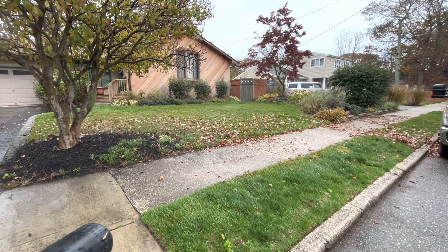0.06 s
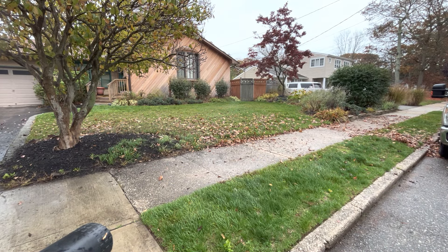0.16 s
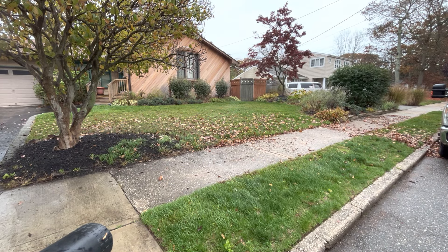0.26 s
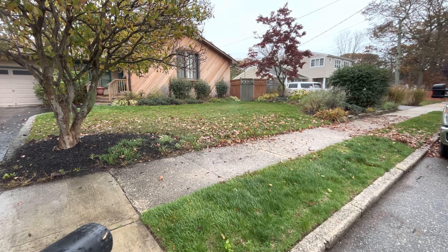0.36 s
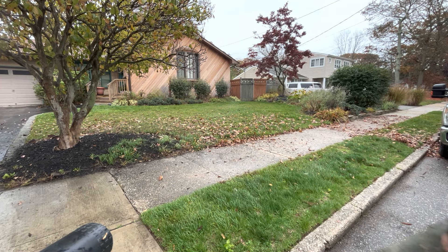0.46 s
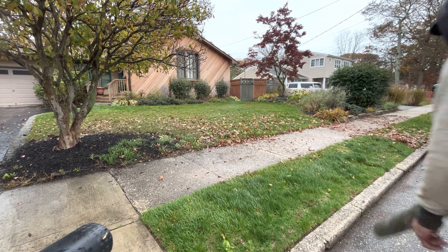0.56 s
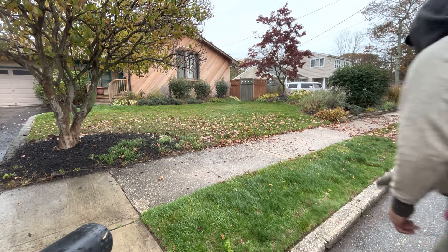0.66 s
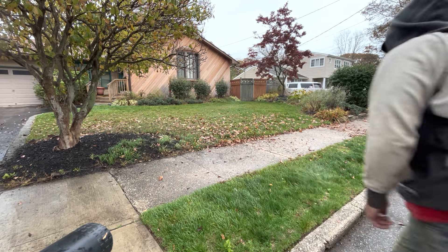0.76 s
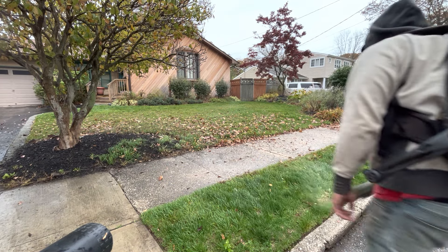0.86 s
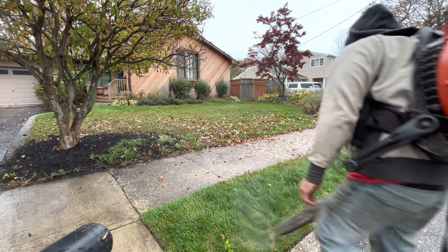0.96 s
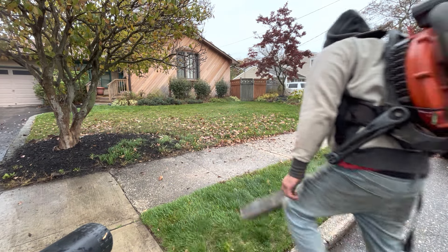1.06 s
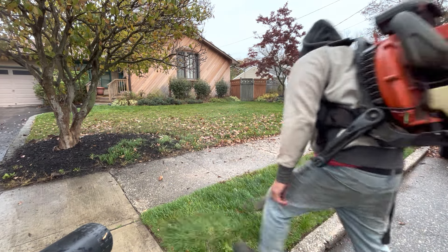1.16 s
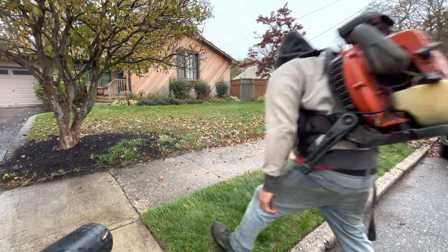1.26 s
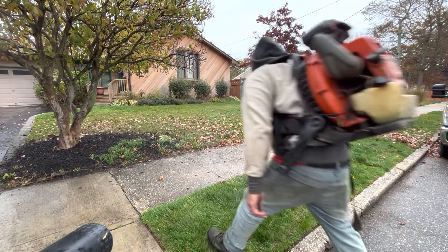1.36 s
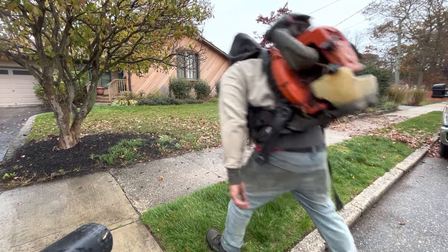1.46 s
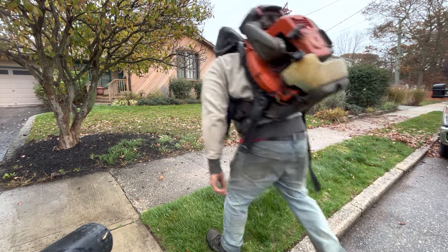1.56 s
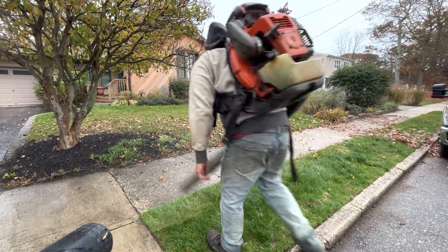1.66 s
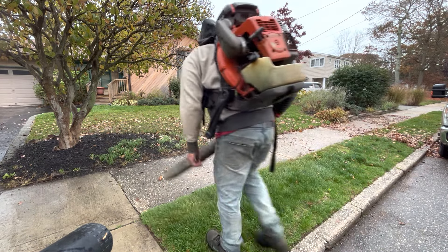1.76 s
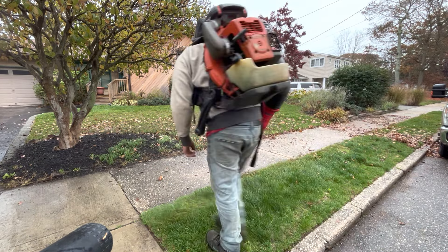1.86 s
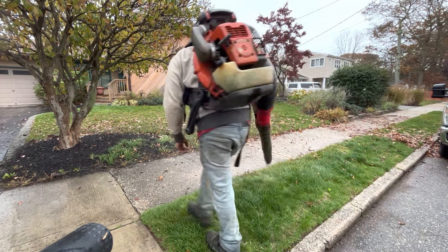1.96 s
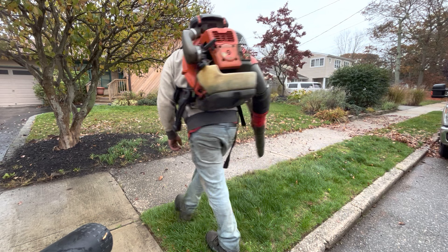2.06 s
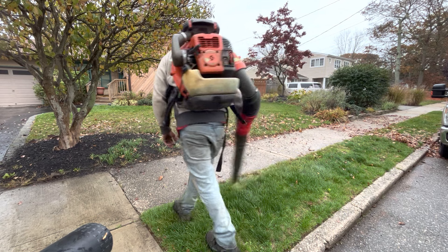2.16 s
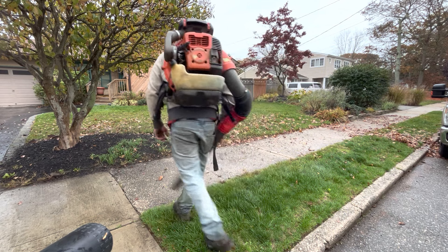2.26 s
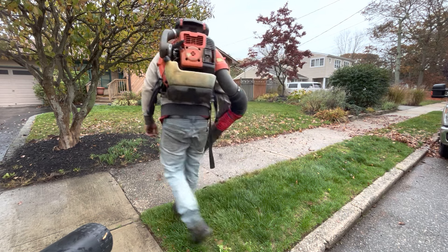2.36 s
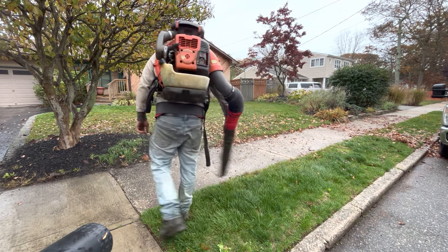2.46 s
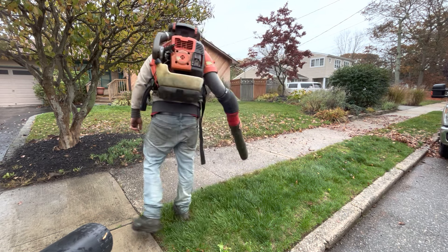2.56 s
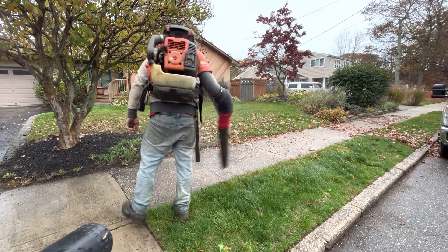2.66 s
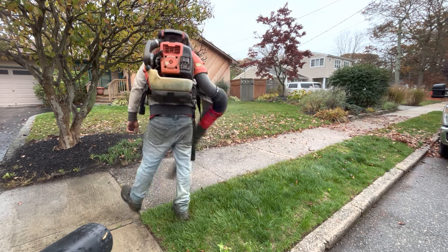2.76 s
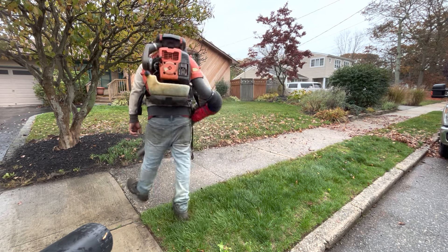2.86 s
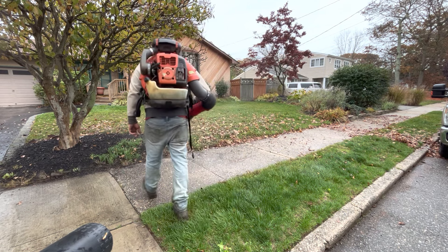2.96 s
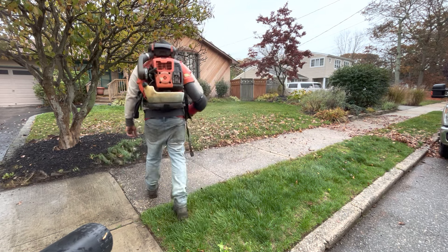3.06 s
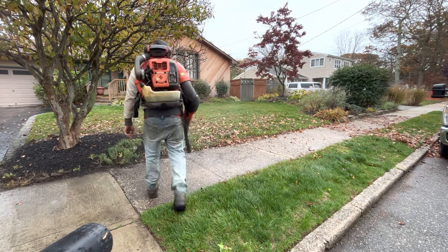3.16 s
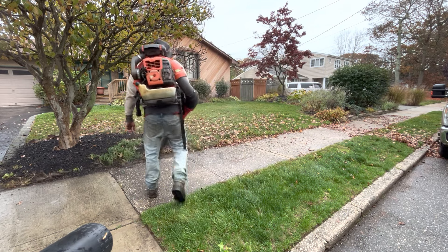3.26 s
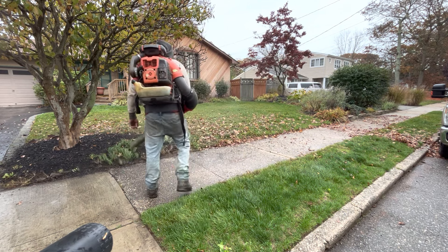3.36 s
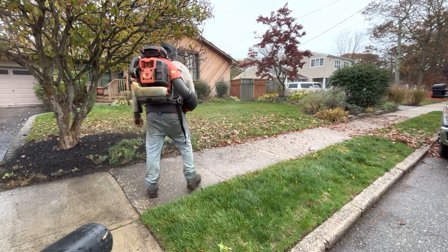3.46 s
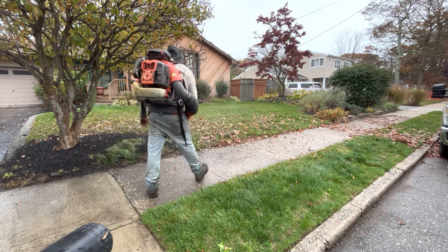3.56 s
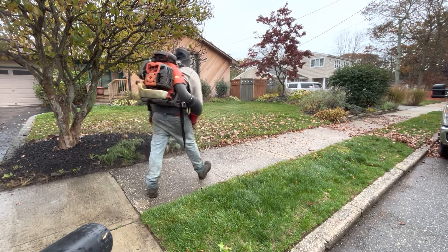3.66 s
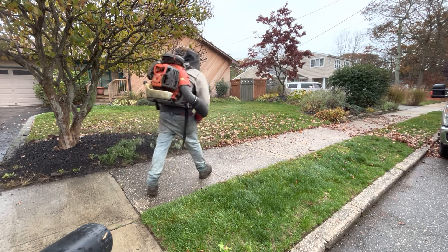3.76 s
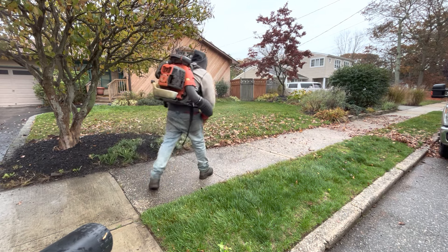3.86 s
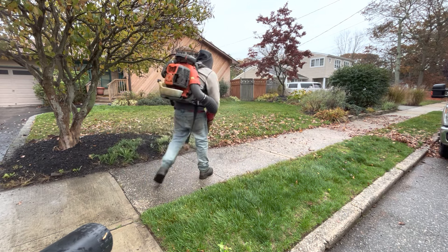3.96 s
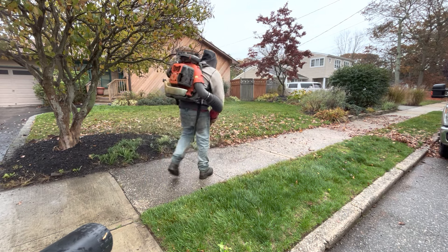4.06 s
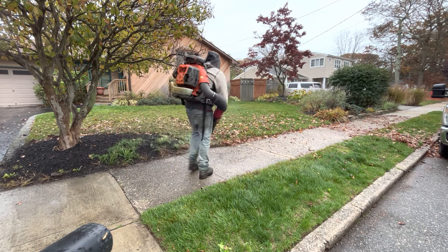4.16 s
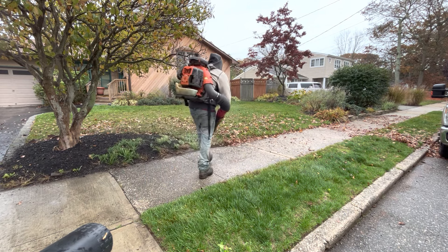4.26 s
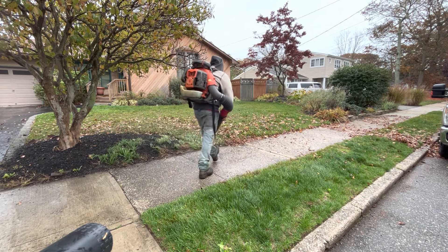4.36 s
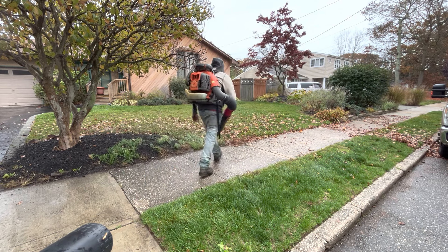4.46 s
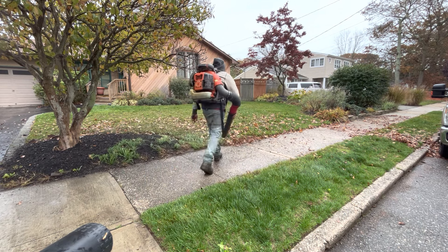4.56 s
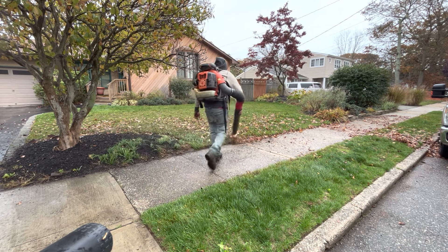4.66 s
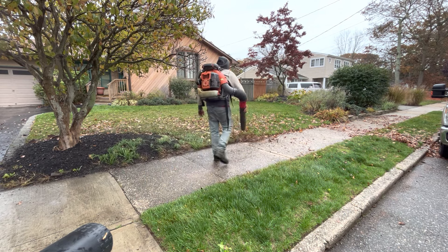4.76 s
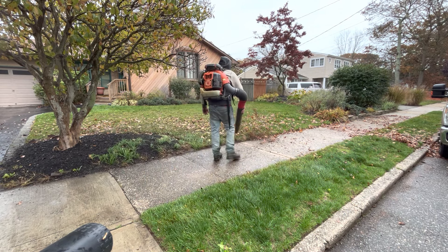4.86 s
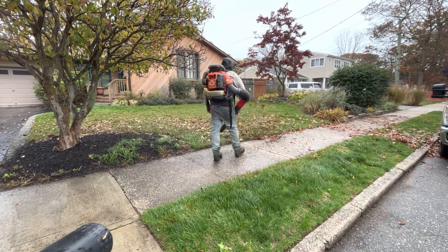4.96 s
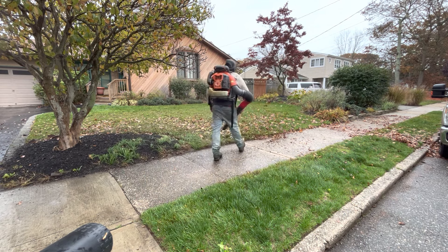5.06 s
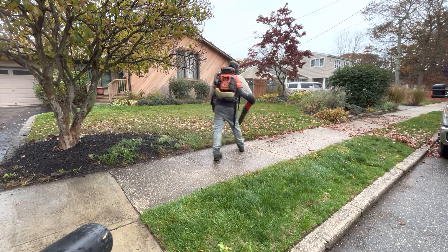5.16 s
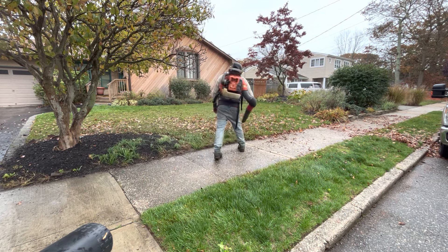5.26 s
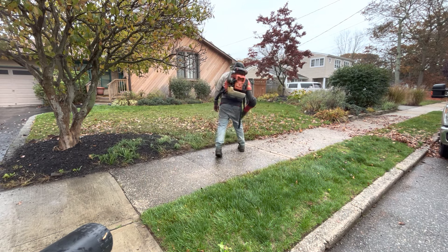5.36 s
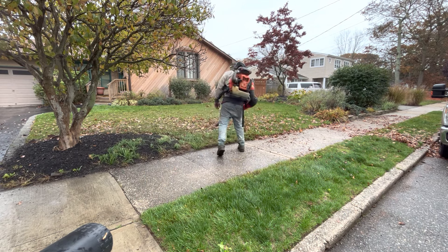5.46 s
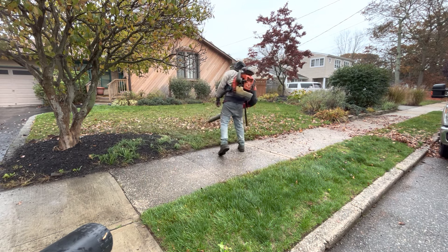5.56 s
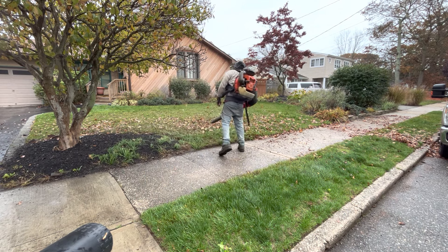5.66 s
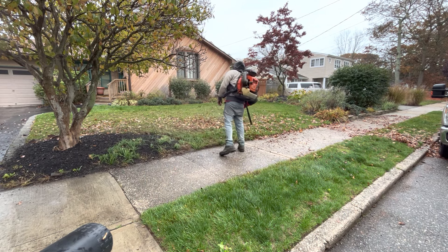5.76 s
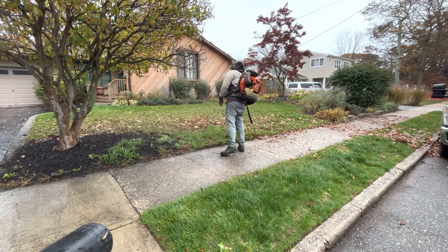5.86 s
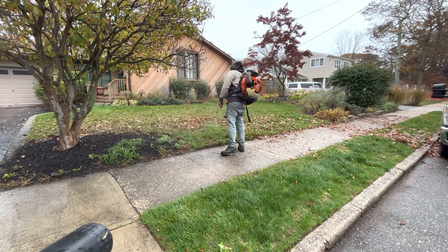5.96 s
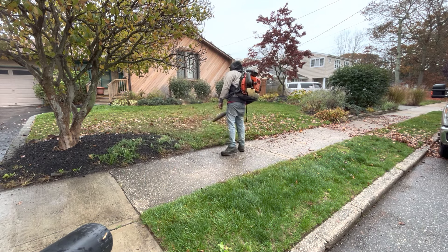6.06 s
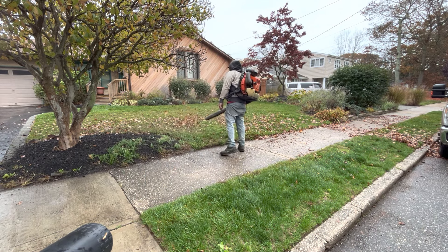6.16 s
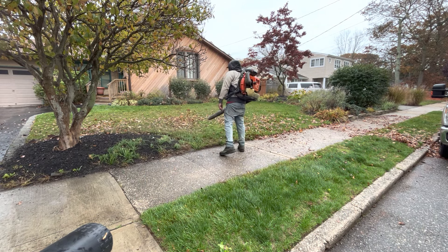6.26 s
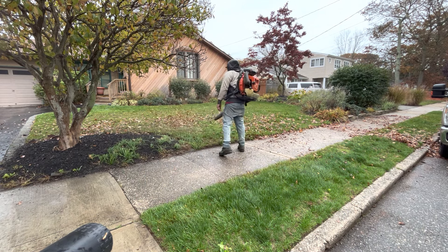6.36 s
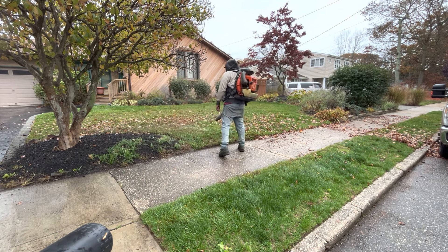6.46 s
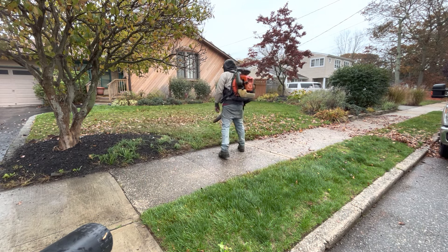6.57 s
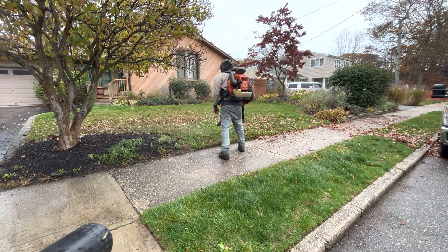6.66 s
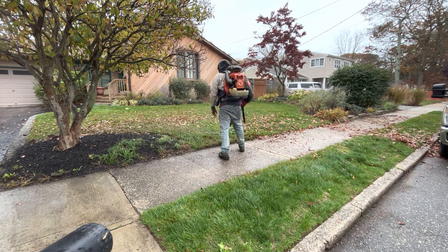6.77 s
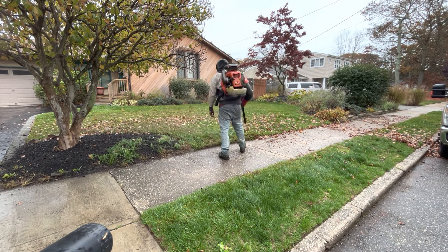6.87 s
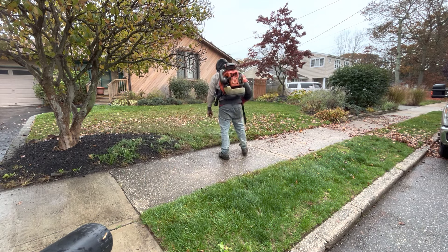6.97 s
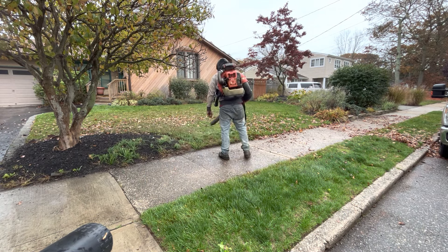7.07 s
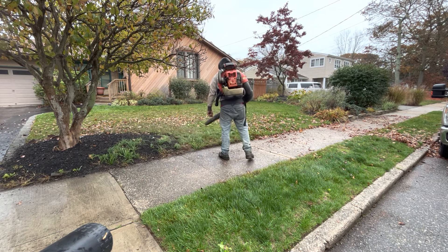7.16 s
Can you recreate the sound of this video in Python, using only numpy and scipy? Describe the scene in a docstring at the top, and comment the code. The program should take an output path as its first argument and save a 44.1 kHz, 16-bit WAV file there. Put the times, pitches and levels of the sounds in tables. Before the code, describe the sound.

Outdoors on a suburban lawn, a two-stroke backpack blower runs steadily at full throttle. It passes very close on the right of a fixed stereo microphone, with heavy low hum, nasal buzz and roaring air, then drifts to the center and grows weaker as the worker walks away. Hiss from the swinging nozzle rises and dips, short thin whines flare up, and two tiny grit ticks occur. It comes back slightly nearer at the end.

```python
"""On a lawn, a worker with a two-stroke backpack leaf blower at full throttle passes close on the right,
walks off and at the end comes part of the way back.
Each firing drives the exhaust hum and rings the muffler; the echo off the ground shifts as he moves.
Air roars through the fan and hisses from the swinging nozzle, throbbing with the engine.
Brief whines flare up, and two flicks of grit tick against the tube."""
import sys
import numpy as np
from scipy import signal
from scipy.fft import rfft, irfft, next_fast_len
from scipy.io import wavfile
from scipy.ndimage import uniform_filter1d

SR = 44100
rng = np.random.default_rng(int(sys.argv[2]) if len(sys.argv) > 2 else 0)


def waveform_to_disk(signal):
    """Save audio, clipped to [-1, 1], as 16-bit WAV at the path in sys.argv[1]."""
    frames = np.transpose(np.atleast_2d(signal))
    scaled = np.clip(frames, -1, 1) * 32767
    samples = np.round(scaled).astype(np.int16)
    wavfile.write(sys.argv[1], SR, samples)


N = 318402  # samples in the scene
HOP = 256  # samples from one frame to the next
TIME = np.arange(N) / SR
FRAME_S = np.arange(-(-N // HOP) + 1) * HOP / SR
BIN_HZ = np.fft.rfftfreq(4 * HOP, 1 / SR)

# Average engine speed: time_s, firings_per_s
ENGINE_SPEED = [(0.0, 117.7), (0.54, 117.4), (0.62, 116.7), (1.2, 116.5), (1.26, 117.0), (1.67, 116.1),
                (1.81, 116.8), (2.03, 115.9), (2.23, 116.6), (2.79, 116.2), (3.1, 116.8), (3.6, 116.2),
                (3.68, 116.7), (5.0, 116.5), (5.41, 115.9), (5.45, 116.8), (6.8, 117.1), (6.84, 116.7),
                (7.18, 116.7), (7.22, 117.3)]
# The worker's path: time_s, distance_m, bearing_deg (positive to the right)
WALK_PATH = [(0.0, 2, 56), (0.5, 1.4, 48), (1.05, 1.335, 43), (1.35, 1.5, 29), (1.66, 1.74, 12.5),
             (2.1, 1.62, 6), (2.65, 2.2, -3.5), (3.05, 2.07, -5.5), (3.5, 3.2, -8.0), (4.1, 4.6, -5),
             (4.8, 5.3, 0.5), (5.3, 5.3, 7), (5.9, 6.8, 11.5), (6.6, 6.5, 9.5), (7.22, 4.15, 6)]
# How squarely the exhaust faces the microphone: time_s, share (0-1)
EXHAUST_FACING = [(0, 0.24), (1.2, 0.2), (1.7, 0.94), (3, 0.31), (4, 0.75), (5, 0.34), (5.6, 0.3),
                  (7.2, 0.6)]
# Swing of the nozzle: time_s, gain_db toward the microphone, before each air layer's share
NOZZLE_AIM = [(0, -1.5), (.4, 1), (1.4, 0), (2.1, 0), (2.45, -1.8), (2.85, -3), (3.2, -6.5), (3.45, -5),
              (3.8, 0.5), (4.1, -0.5), (4.5, -0.9), (4.9, -1.4), (5.4, -2.5), (6.1, -1), (6.45, -1.1),
              (6.85, 1), (7.22, -2.5)]

# Low partials of the exhaust: multiple of the firing rate, curve name, extra_db, side_on_gain_db
HUM_PARTIALS = [(1, "boom", 0, 1), (2, "drone", 0, 2), (3, "growl", 1.5, 2.5), (4, "blare", 0, 4.5),
                (5, "bray", -0.7, 0.5), (6, "drone", -16, 2.5)]
# Level curves of the hum, before the extra gains: time_s, level_db
BOOM_LEVEL = [(0, -33.5), (.5, -29.5), (1, -30), (1.8, -26.5), (2.7, -32.5), (3.35, -41), (3.8, -37),
              (4.4, -37), (5.3, -33.5), (5.8, -34.5), (7.22, -32)]  # the firing note
DRONE_LEVEL = [(0, -28.5), (.55, -26), (1.3, -26), (1.7, -28), (2.9, -27), (3.4, -30), (4.2, -31),
               (5.5, -40.5), (6.1, -37.5), (6.6, -37.5), (7.22, -32)]  # its octave, also used for the sixth partial
GROWL_LEVEL = [(0, -39), (.5, -33), (1.2, -32), (2.1, -36), (3, -46), (4.5, -48), (5.1, -51.5),
               (5.9, -42.5), (7.22, -44)]  # the third partial
BLARE_LEVEL = [(0, -29.5), (.45, -30.5), (1.4, -39.5), (2.4, -39), (2.9, -33.5), (4, -42), (4.7, -43.5),
               (5.6, -40), (6.2, -38.5), (7.22, -44.5)]  # the double octave
BRAY_LEVEL = [(0, -28.5), (.5, -23), (1.1, -26), (1.5, -29.5), (2.05, -31), (2.8, -42.5), (3.3, -44),
              (4, -58), (4.35, -39), (4.85, -45), (5.15, -50), (5.65, -41), (6.3, -41), (7.22, -46.5)]  # the fifth partial
# Level curves of the partials that sing out, before the shared boost: time_s, level_db
HONK_LEVEL = [(0, -44), (.7, -33), (1.1, -34), (1.7, -44.5), (2.1, -48), (2.5, -39.5), (2.85, -40),
              (3.25, -44), (3.6, -38), (4.1, -51), (4.5, -41.5), (5.2, -41.5), (5.8, -62), (6.7, -57),
              (7.22, -43)]
TWANG_LEVEL = [(0, -35), (.8, -43), (1.9, -43), (2.4, -47), (3, -46), (3.55, -53), (3.75, -45), (4.2, -42),
               (4.5, -57), (5.5, -46), (6.3, -49), (7.22, -45)]
NASAL_LEVEL = [(0, -39), (0.4, -40.5), (1.3, -31.5), (1.5, -41), (1.8, -36), (2.1, -48), (2.55, -50),
               (2.7, -40.5), (2.92, -36), (3.1, -39.5), (3.3, -54), (3.52, -40), (4.3, -41), (5.3, -45.5),
               (5.55, -55), (5.75, -42), (6.05, -53), (7.22, -48)]
REEDY_LEVEL = [(0, -37.5), (.75, -36), (1.2, -47), (1.7, -50), (2.13, -39), (2.3, -50), (3.35, -51),
               (3.55, -43), (4, -39.8), (4.55, -41.5), (5.18, -54), (5.32, -44), (5.8, -55), (6.6, -50),
               (6.8, -45.5), (7.22, -44)]
# Ring of the muffler, before the loss with distance: time_s, level_db
RASP_LEVEL = [(0.0, -29), (0.4, -31), (1.2, -30.5), (1.6, -28.5), (2.1, -28), (2.7, -30.5), (3.3, -32),
              (3.7, -27.5), (4.4, -28), (5.0, -26.5), (5.4, -28), (5.8, -30.5), (6.4, -27), (6.9, -23.5),
              (7.22, -27.5)]
# Resonances of the muffler: pitch_hz, width_hz, relative level_db
MUFFLER_MODES = [(1070, 240, -18), (1294, 80, -14.5), (1605, 100, -13), (1985, 42, -18), (2215, 52, -16.5),
                 (2780, 87, -26), (2880, 1500, -21)]
# Resonances of the fan housing: pitch_hz, width_hz, relative level_db
HOUSING_MODES = [(3400, 240, -10), (3750, 390, -16), (4005, 180, -14), (4940, 240, -26), (5600, 190, -13.5),
                 (6880, 150, -19)]

# Layers of the air, by name: base level_db, loss_db per doubling of distance,
# share of the nozzle's swing, loss_db behind his body (negative means louder)
AIR_LAYERS = {"roar": (-29.5, 3.5, 0.23, -2), "rush": (-28, 3.5, 1, -0.5), "sizzle": (-31, 4, 1.3, 0.5),
              "hiss": (-30.5, 4.5, 1.78, 14), "whistle": (-40, 3, 3, 14)}
# Tone colours of the air: pitch_hz, relative level_db
ROAR_COLOUR = [(20, -62), (43, -27), (68, -9.5), (130, -13.5), (200, -6.5), (300, -3.5), (410, 2.5),
               (520, 0.5), (630, 5), (800, -3), (1000, -3), (1400, -26), (3000, -72)]
RUSH_COLOUR = [(400, -60), (800, -11), (1100, 1), (1600, 1), (2200, -1), (2900, -4.5), (3450, -4.5),
               (3950, -11.5), (4600, -45), (7000, -58)]
SIZZLE_COLOUR = [(2500, -16.5), (3700, 3.5), (4200, 2), (4700, 3), (5100, 6.5), (5600, 1.5), (6000, 2.5),
                 (6400, 1), (7100, -7.5), (7800, -5), (9000, -43)]
HISS_COLOUR = [(4000, -35), (6500, -8), (7500, -2), (8500, -1), (9500, 0.5), (11000, 1.5), (12300, -1),
               (13700, -2), (14300, -14), (15000, -40)]
# Narrow whines that flare up as he turns: middle_s, length_s, pitch_hz, level_db, roughness (0-1)
WHINE_FLARES = [(.2, .7, 7000, -45, .7), (.25, .7, 3930, -44.5, .1), (.25, .8, 3380, -40, 0),
                (1.18, .56, 3320, -40.5, 0.4), (1.62, .3, 7050, -41, .7), (1.72, .45, 3740, -37, .4),
                (2.3, 1.1, 3390, -43.5, 0.3), (2.4, .9, 3750, -44, 0.3), (2.55, .8, 5520, -43, 0.9),
                (3.75, 1, 7050, -46, .7), (4.1, 0.89, 5600, -47, 0.6), (4.1, 1.55, 2240, -47.5, .1),
                (4.25, .9, 4080, -53, .85), (4.5, 2.3, 2798, -49.5, .05), (5.05, .7, 5050, -48, .85),
                (5.1, 0.34, 7040, -47.5, 0.5), (5.72, .25, 3780, -44.5, 0), (6.9, 0.93, 5060, -45, .85)]
# Grit flicking against the tube: start_s, level_db, pitch_hz
GRIT_TICKS = [(.462, -19.5, 8200), (3.801, -16.5, 10800)]

# The microphone's two ports: pitch_hz, share of the pan, own left-minus-right level_db,
# likeness of the ports (0-1), factor on the time lag
PORT_BANDS = [(109, 0.33, 2.5, 0.55, 1.6), (241, 0.16, 1.3, 1, 2.43), (523, 0.97, 2.5, 0.73, 1.84),
              (775, 1.65, 0, 0.6, 1.62), (1630, 1.03, 0.5, 0.86, 1.16), (2600, 0.66, -2, 1, 0.87),
              (4300, 1.34, -6.5, 0.39, 1.36), (5500, 0.42, -12, 0.15, 1.16), (6800, 0.94, -4, 0.11, 0.56),
              (7840, 1.4, -1.5, 0.54, 0.35), (8550, 1, -4, 0.55, 0.22), (9200, 0.1, -1.5, 1, 0.032),
              (11100, 0.1, 2, 0.95, 0.015), (12500, 0.08, 0, 0.79, 0.01)]
# In the treble the left channel runs out of step with the right: pitch_hz, left_lead_rad
LEFT_TREBLE_LEAD = [(4400, 0), (5800, -1), (7300, 1), (8600, 2), (9600, 3.5), (11000, 5), (12000, 5), (13000, 7.5),
                    (14300, 9)]

HONK_ORDER, TWANG_ORDER, NASAL_ORDER, REEDY_ORDER = 7, 8, 12, 14  # multiples of the firing rate
EXHAUST_BOOST_DB = 3  # shared by the hum and the singing partials
FAR_M = 2.8  # around this distance the firing note begins to trail further behind
PUFF_TURNS = 0.18  # half width of the burst at each firing
SHADOW_DEG, SHADOW_EDGE_DEG = 20.2, 15  # bearing where his body half hides the nozzle, and softness
HEIGHTS_M = 3.233  # height of the engine plus height of the microphone
SOUND_M_PER_S = 343
PORT_LAG_MS = 0.47  # delay for a sound from the side, before each band's factor
# Left minus right, straight ahead and toward the sides, before each band's share:
PAN_AHEAD_DB, PAN_SWING_DB, PAN_WIDTH_DEG = 3.5, 7, 20
EDGE_HZ = 15600  # the recorder's treble limit


def crank(flutter=0.0012, flutter_hz=25):
    """Turns of the crankshaft, one per firing; uneven burns make the speed flutter."""
    unevenness = np.interp(TIME, FRAME_S, wander(flutter_hz))
    firings_per_s = at(ENGINE_SPEED, TIME) * (1 + flutter * unevenness)
    return np.cumsum(firings_per_s) / SR


def hum(turns, pipe_turns=0.12, pipe_hz=295, pipe_q=4, waver_db=0.29, burn_db=0.3, burn_hz=45):
    """The low partials of the exhaust pulse strike together and ring the pipe; the firing note trails."""
    curves = {"boom": BOOM_LEVEL, "drone": DRONE_LEVEL, "growl": GROWL_LEVEL,
              "blare": BLARE_LEVEL, "bray": BRAY_LEVEL}
    out = np.zeros(N)
    far = .5 + .5 * np.tanh(2 * (at(WALK_PATH, FRAME_S) - FAR_M))
    for order, name, extra_db, side_db in HUM_PARTIALS:
        level = extra_db + at(curves[name], FRAME_S) + side_db * side_on(FRAME_S)
        level = level + waver_db * np.log2(order) * wander(11.0)
        # uneven burns roughen the overtones
        level = level + burn_db * np.log2(order + 0.41) * wander(burn_hz)
        detune = order * at(ENGINE_SPEED, FRAME_S) / pipe_hz
        late = np.arctan(pipe_q * (detune - 1 / detune))
        if order == 1:
            late = late + (1 + far) * np.pi / 2  # the firing note trails more from afar
        out += partial(turns - pipe_turns, order, np.exp(-1j * late) * amp(level + EXHAUST_BOOST_DB))
    return out


def overtone(turns, curve, order, waver, throb=0, waver_hz=12):
    """One partial of the exhaust sings out, coming and going as he walks; it may throb with each firing."""
    unsteady = 1 + waver * (wander(waver_hz) + 1j * wander(waver_hz))
    gain = amp(at(curve, FRAME_S) + EXHAUST_BOOST_DB) * unsteady
    return partial(turns, order, gain) * (1 + throb * np.cos(2 * np.pi * turns))


def rasp(turns, order=9, count=28):
    """The buzz of the muffler: its partials strike together, one crack a firing."""
    orders = [k for k in range(order, count) if k not in (NASAL_ORDER, REEDY_ORDER)]
    return ring(turns, MUFFLER_MODES, orders, muffler_level(), echo=0.8, scatter=0.91, scatter_hz=2.5)


def whine(turns, order=28, count=64):
    """The fan's high partials ring its housing, each swelling and fading on its own."""
    level = air_level("sizzle", FRAME_S) - 3.0
    return ring(turns, HOUSING_MODES, range(order, count), level, echo=0.53, scatter=1.0, scatter_hz=2.5)


def ring(turns, modes, orders, level_db, echo, scatter, scatter_hz, smear=0.015):
    """Each turn rings a shell; paths off the body and the yard make single partials swell and fade."""
    out = np.zeros(N)
    firing_hz = np.mean(at(ENGINE_SPEED, FRAME_S))
    for order in orders:
        hz = order * firing_hz
        power = sum(amp(db) ** 2 / (1 + (2 * (hz - mode_hz) / width_hz) ** 2)
                    for mode_hz, width_hz, db in modes)
        paths = ground(hz, echo) + scatter * (wander(scatter_hz) + 1j * wander(scatter_hz))
        # the shell spreads each crack in time
        late = np.exp(-1j * smear * (order - np.mean(orders)) ** 2)
        out += partial(turns, order, np.sqrt(power) * paths * late * amp(level_db))
    return out


def partial(turns, order, gain):
    """One multiple of the firing rate, a cosine with a moving complex gain."""
    shift = np.interp(TIME, FRAME_S, np.unwrap(np.angle(gain)))
    return np.interp(TIME, FRAME_S, abs(gain)) * np.cos(2 * np.pi * order * turns + shift)


def air(turns):
    """Air through the blower: roar of the tube, rush of the intake, sizzle of the fan, hiss of the nozzle."""
    roar = flow(turns - .15, ROAR_COLOUR, air_level("roar", TIME) - .5, throb=0.25, gust_db=0.83)
    rush = flow(turns, RUSH_COLOUR, air_level("rush", TIME) - 2.0, throb=0.25, gust_db=0.5)
    sizzle = flow(turns, SIZZLE_COLOUR, air_level("sizzle", TIME), throb=0.56, gust_db=0.78)
    hiss = flow(turns, HISS_COLOUR, air_level("hiss", TIME), throb=2.1, gust_db=0.5)
    return roar + rush + sizzle + hiss + whistle(turns)


def flow(turns, spectrum, level_db, throb, gust_db):
    """Turbulent air, made of coloured noise, that puffs up with each firing."""
    bursts = puffs(turns)
    depth = throb * at(EXHAUST_FACING, TIME)
    gate = np.sqrt((1 + depth * bursts) / (1 + depth * bursts.mean()))  # keeps the mean power
    gusts = gust_db * np.interp(TIME, FRAME_S, wander(21))
    return noise(spectrum) * gate * amp(level_db + gusts)


def puffs(turns):
    """A burst of height about 1 each time the exhaust port opens; no two are quite equal."""
    firing = np.round(turns).astype(int)
    strength = amp(rng.standard_normal(firing[-1] + 1))[firing]
    return strength * np.exp(-.5 * ((turns - firing) / PUFF_TURNS) ** 2)


def whistle(turns, hz=7130, width_hz=420):
    """Each firing blows a short, narrow whistle out of the engine."""
    return breath(turns, hz, width_hz) * amp(air_level("whistle", TIME))


def breath(turns, hz, width_hz):
    """A narrow band of air, blown out in one burst a firing."""
    band = [(hz - 3 * width_hz, -40), (hz - width_hz / 2, -3), (hz, 0),
            (hz + width_hz / 2, -3), (hz + 3 * width_hz, -40)]
    return noise(band) * unit(puffs(turns))


def flares(turns, width_hz=130, breath_hz=280, edge_db=10):
    """Brief whines, part clean partials and part throbbing air, that swell and fade together."""
    tones, airy = np.zeros(N), np.zeros((2, N))
    firing_hz = np.mean(at(ENGINE_SPEED, FRAME_S))
    for middle_s, length_s, hz, db, rough in WHINE_FLARES:
        middle = round(hz / firing_hz)
        level = db - edge_db * (2 * (FRAME_S - middle_s) / length_s) ** 2
        clean = ring(turns, [(hz, width_hz, 0)], range(middle - 1, middle + 2), level,
                     echo=0, scatter=0.41, scatter_hz=6.9)
        tones += np.sqrt(1 - rough) * clean
        airy += np.sqrt(rough) * breath(turns, hz, breath_hz) * np.interp(TIME, FRAME_S, amp(level))
    return tones, airy


def ticks(decay_s=0.00055, knock=0.59):
    """Short, bright flicks of grit: a fading tone plus a weaker one an octave below."""
    out, t = np.zeros(N), np.arange(SR // 100) / SR
    for start_s, db, hz in GRIT_TICKS:
        flick = np.sin(2 * np.pi * hz * t) + knock * np.sin(np.pi * hz * t)
        out[round(start_s * SR):][:len(t)] += amp(db) * flick * np.exp(-t / decay_s)
    return out


def side_on(t):
    """Near 1 while he passes side-on to the microphone, near 0 once his back is turned."""
    return .5 + .5 * np.tanh((at(WALK_PATH, t, axis=2) - SHADOW_DEG) / SHADOW_EDGE_DEG)


def spreading(t, loss_db):
    """Level in dB, falling by loss_db with each doubling of the distance."""
    return -loss_db * np.log2(at(WALK_PATH, t))


def air_level(name, t):
    """Level in dB of one air layer, from distance, the nozzle's swing and the shadow of the body."""
    db, loss_db, swing, shadow_db = AIR_LAYERS[name]
    return db + spreading(t, loss_db) + swing * at(NOZZLE_AIM, t) - shadow_db * side_on(t)


def muffler_level(loss_db=5.0):
    """Level in dB of the muffler's ring, weaker with distance, frame by frame."""
    return at(RASP_LEVEL, FRAME_S) + spreading(FRAME_S, loss_db)


def ground(hz, share):
    """The direct sound plus its echo off the ground, which follows sooner the farther away he is."""
    distance = at(WALK_PATH, FRAME_S)
    delay_s = (np.hypot(distance, HEIGHTS_M) - distance) / SOUND_M_PER_S
    return 1 + share * np.exp(-2j * np.pi * hz * delay_s)


def patches(depth_db=2.23, span_hz=300, span_s=0.647, onset_hz=900):
    """Reflections off the moving body colour the air in narrow, slow bands; long waves pass round him."""
    field = rng.standard_normal((len(BIN_HZ), len(FRAME_S)))
    field = uniform_filter1d(field, round(span_hz / BIN_HZ[1]), axis=0)
    field = unit(uniform_filter1d(field, round(span_s * SR / HOP), axis=1))
    return amp(depth_db * field * (BIN_HZ / (BIN_HZ + onset_hz))[:, None])


def ports(engine, airflow):
    """Places the blower: the far port hears it later and weaker, and the spread-out air differs by port."""
    layers = np.vstack([engine, airflow])
    tones, near, spread = signal.stft(layers, nperseg=4 * HOP, noverlap=3 * HOP)[2]
    hz, colour = BIN_HZ[:, None], patches()
    same = over(PORT_BANDS, hz, axis=3)
    shared = tones + colour * near * np.sqrt((1 + same) / 2)
    apart = colour * spread * np.sqrt((1 - same) / 2)
    bearing = at(WALK_PATH, FRAME_S, axis=2)
    pan_db = PAN_AHEAD_DB - PAN_SWING_DB * np.tanh(bearing / PAN_WIDTH_DEG)
    lean = amp(over(PORT_BANDS, hz, axis=1) * pan_db + over(PORT_BANDS, hz, axis=2))
    # long waves bend round the microphone's body and take longer
    lag_s = over(PORT_BANDS, hz, axis=4) * PORT_LAG_MS * np.sin(np.radians(bearing)) / 1000
    late = np.exp(-1j * np.pi * hz * lag_s)  # half the lag for each port
    left = (shared + apart) * lean * late * np.exp(1j * over(LEFT_TREBLE_LEAD, hz))
    right = (shared - apart) / late
    pair = np.array([left, right]) * np.sqrt(2 / (1 + lean ** 2))  # keeps the power of the pair
    return signal.istft(pair, nperseg=4 * HOP, noverlap=3 * HOP)[1][:, :N]


def noise(spectrum):
    """Two unrelated noises of one colour."""
    size = next_fast_len(N, real=True)
    colour = amp(over(spectrum, np.fft.rfftfreq(size, 1 / SR)))
    return unit(irfft(rfft(rng.standard_normal((2, size))) * colour, size)[:, :N])


def wander(rate_hz):
    """Slow random drift of rms 1, one value a frame."""
    hz = np.fft.rfftfreq(len(FRAME_S), HOP / SR)
    slow = rfft(rng.standard_normal(len(FRAME_S))) / (1 + (hz / rate_hz) ** 4)
    return unit(irfft(slow, len(FRAME_S)))


def amp(db):
    """Decibels to gain."""
    return 10 ** (np.asarray(db) / 20)


def unit(x):
    """Scales to an rms of 1."""
    return x / np.sqrt(np.mean(abs(x) ** 2) + 1e-20)


def at(rows, t, axis=1):
    """One column of a curve at the times t."""
    rows = np.array(rows)
    return np.interp(t, rows[:, 0], rows[:, axis])


def over(rows, hz, axis=1):
    """One column of a spectrum at the frequencies hz, read along a logarithmic pitch scale."""
    rows = np.array(rows)
    return np.interp(np.log(hz + 1), np.log(rows[:, 0] + 1), rows[:, axis])


def scene():
    """One crankshaft drives the exhaust and the fan."""
    turns = crank()
    singing = overtone(turns, HONK_LEVEL, HONK_ORDER, waver=0.13)
    singing += overtone(turns, TWANG_LEVEL, TWANG_ORDER, waver=0.25)
    singing += overtone(turns, NASAL_LEVEL, NASAL_ORDER, waver=0.15)
    singing += overtone(turns, REEDY_LEVEL, REEDY_ORDER, waver=0.19, throb=0.71)
    flare_tones, flare_air = flares(turns)
    engine = hum(turns) + singing + rasp(turns) + whine(turns) + flare_tones
    return ports(engine + ticks(), air(turns) + flare_air)


def record(dry):
    """The recorder's treble limit, a steep low-pass filter."""
    low_pass = signal.firwin(511, EDGE_HZ, window=("kaiser", 9), fs=SR)
    return signal.oaconvolve(dry, low_pass[None], "same")


dry = scene()
out = record(dry)
waveform_to_disk(out)
```